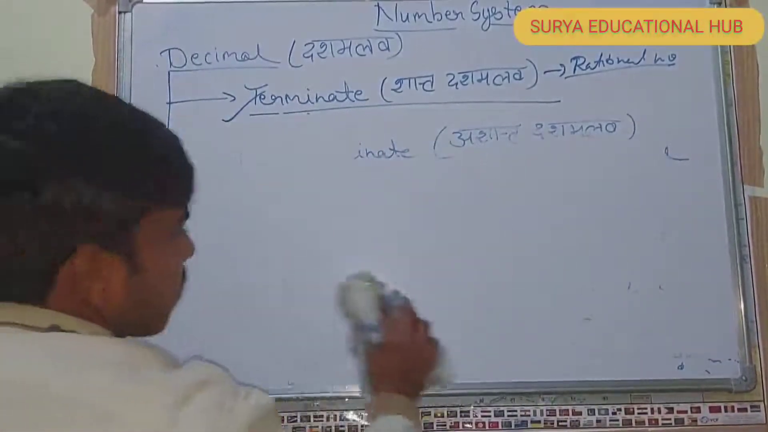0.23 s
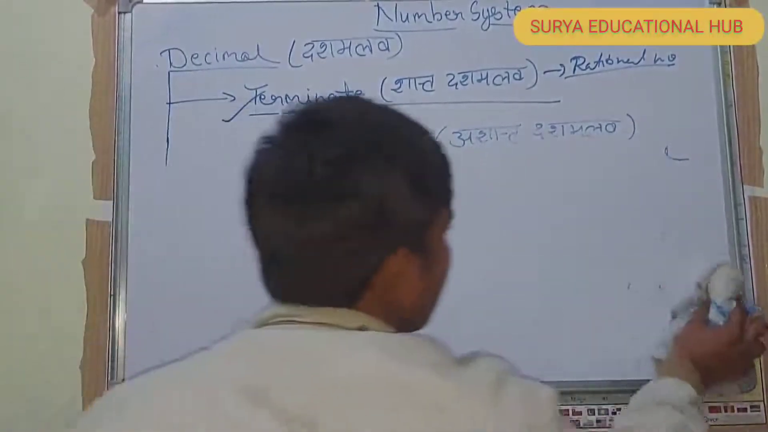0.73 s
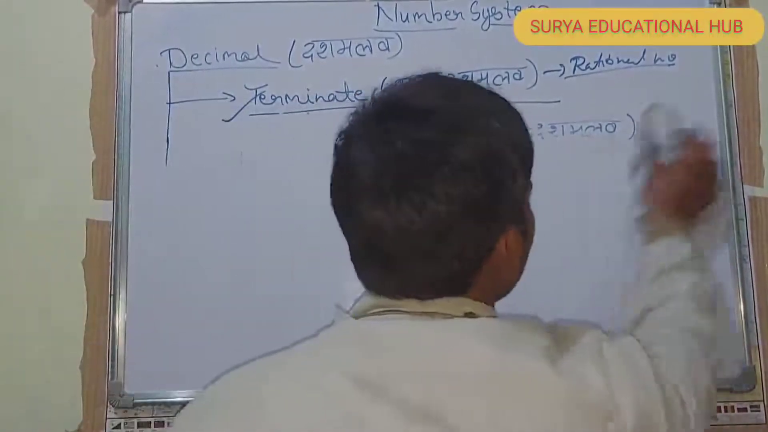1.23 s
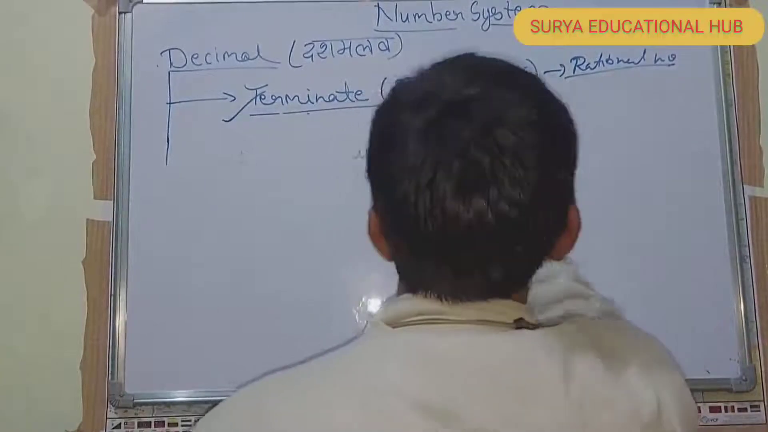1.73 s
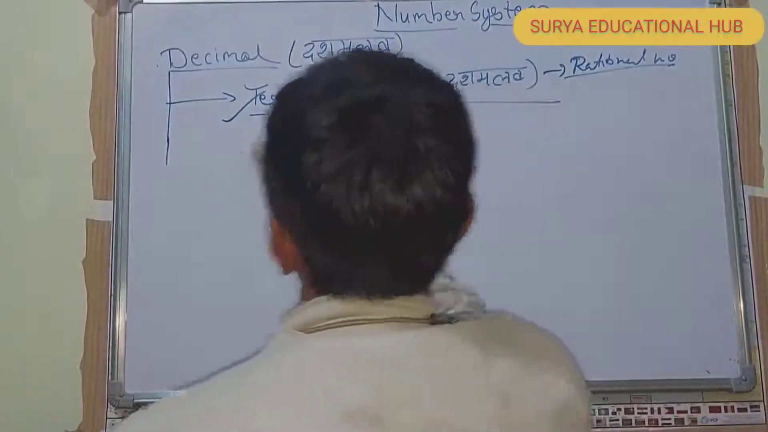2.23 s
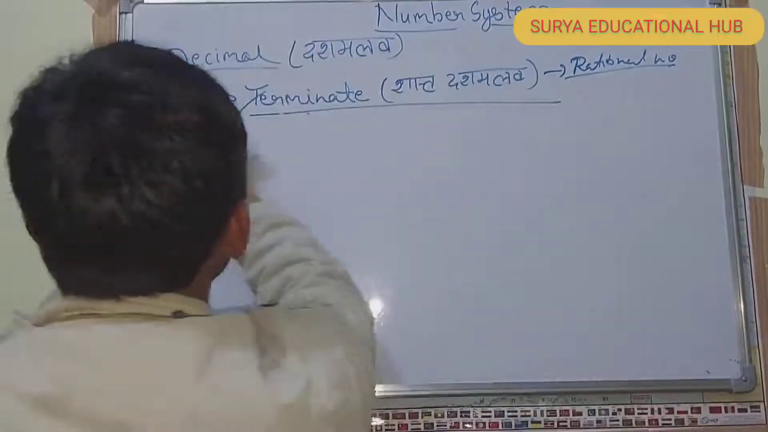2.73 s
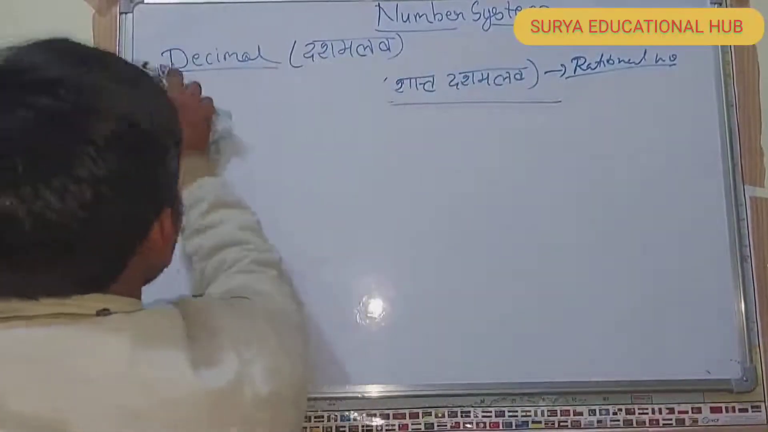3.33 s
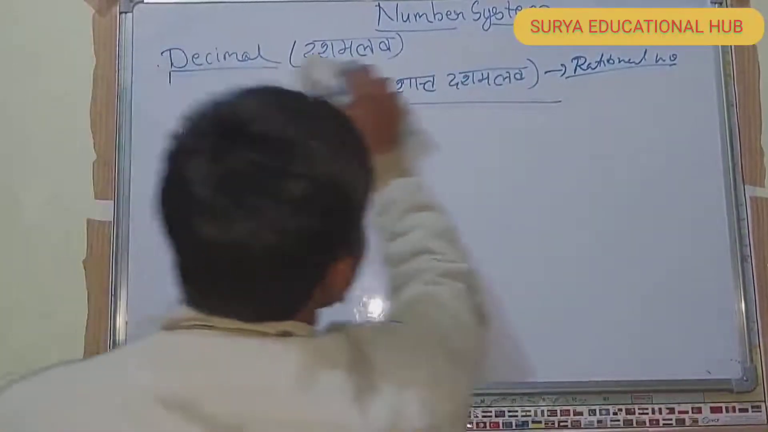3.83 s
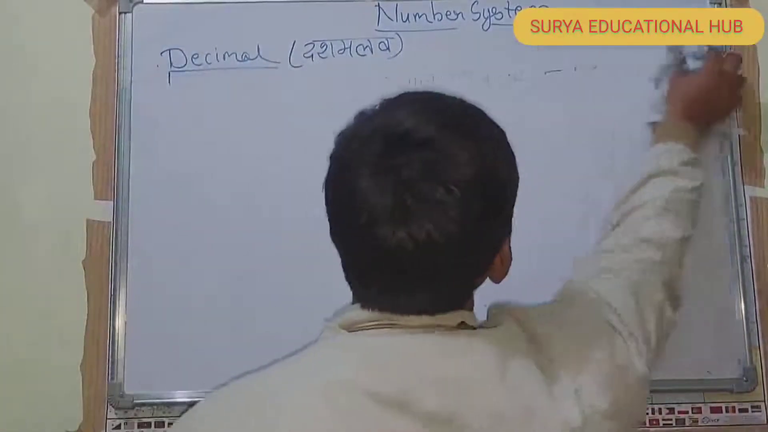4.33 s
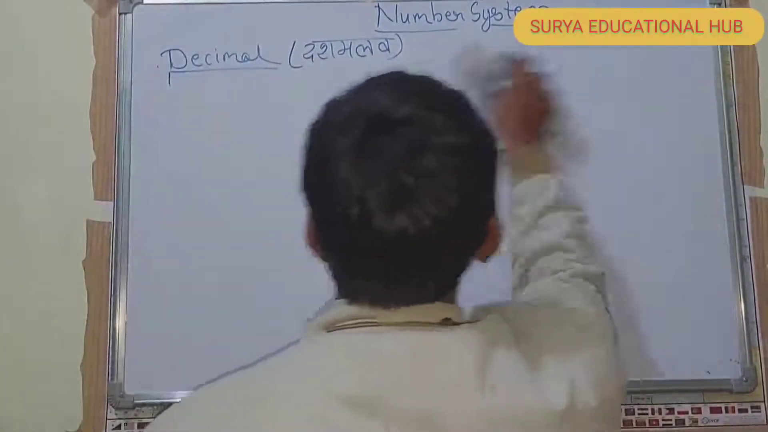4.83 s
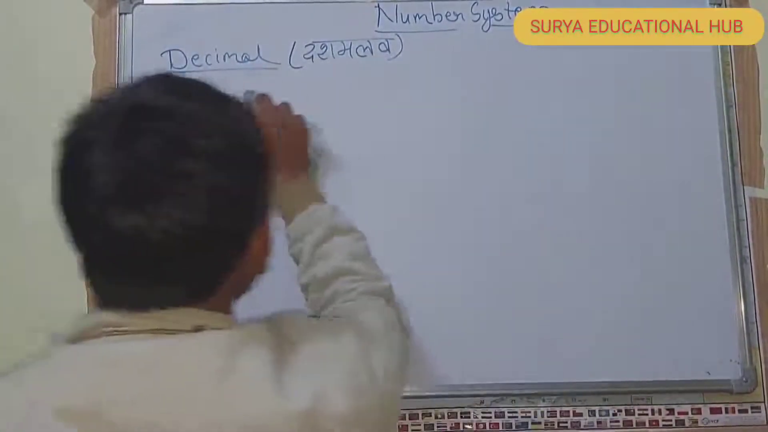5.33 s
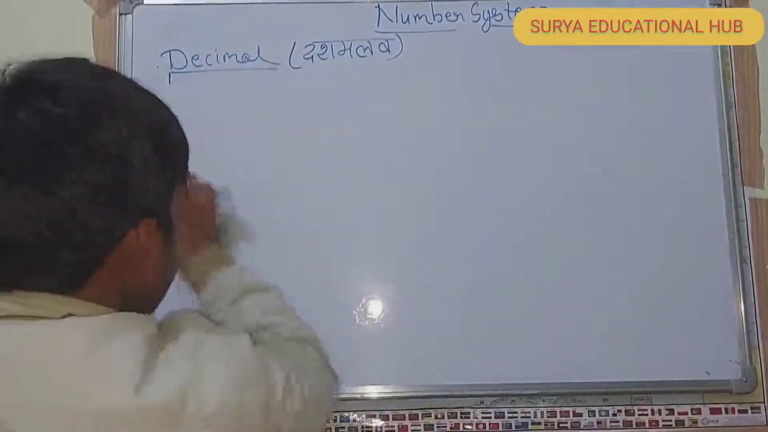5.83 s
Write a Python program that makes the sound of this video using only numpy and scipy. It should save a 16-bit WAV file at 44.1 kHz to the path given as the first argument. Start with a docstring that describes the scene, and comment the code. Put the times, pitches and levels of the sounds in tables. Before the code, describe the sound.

Shirt fabric drags over a clip-on microphone as an arm reaches across a whiteboard. Short dry scrapes arrive with muffled low thumps and sharp little ticks, unevenly spaced, with very quiet gaps holding only soft cloth hiss. The heaviest rubs come just before three seconds and near three and a half; later ones are lighter, with one tiny hollow knock. The stereo is narrow, bass leaning slightly right, with hardly any room sound.

```python
"""At a whiteboard, wiped with a cloth; a small microphone with two capsules is worn on the wiper's shirt.
Each reach of the arm drags fabric over it: a dry scrape of grainy noise and a lumpy rumble through the
housing, both set by a list of rubs; damped swings make the thumps, short noise bursts the ticks.
The cloth on the board adds a fine hiss. Almost no room is heard, only a faint floor and capsule noise."""
import sys
import numpy as np
from scipy import signal
from scipy.fft import rfft, irfft, next_fast_len
from scipy.io import wavfile
from scipy.ndimage import uniform_filter1d, map_coordinates

SR = 44100
rng = np.random.default_rng(int(sys.argv[2]) if len(sys.argv) > 2 else 0)


def to_wav(s):
    """Save 16-bit WAV."""
    ch = np.atleast_2d(s).T  # columns
    pcm = np.round(np.clip(ch, -1, 1) * 32767)  # PCM
    wavfile.write(sys.argv[1], SR, pcm.astype(np.int16))


N = 267687  # length in samples


def amp(db):
    """Decibels to gain."""
    return 10 ** (np.asarray(db) / 20)


def unit(x):
    """Scaled to rms 1."""
    return x / np.sqrt(np.mean(x ** 2) + 1e-20)


def along(points, hz):
    """Curve through (f/Hz, value) points on a log frequency axis."""
    f, value = np.transpose(points)
    return np.interp(np.log(hz + 1), np.log(f + 1), value)


def curves(rows):
    """One value per sample for each column after the time."""
    s, *columns = np.transpose(rows)
    return [np.interp(np.arange(N) / SR, s, column) for column in columns]


def wobble(rate):
    """A smooth random curve, rate knots a second."""
    knots = rng.standard_normal(int(N * rate / SR) + 4)
    return map_coordinates(knots, [np.arange(N) * rate / SR])


def coloured(x, spectrum):
    """x through a causal (minimum-phase) filter with this spectrum, closed at both ends."""
    m = next_fast_len(N + 8192)
    closed = [(1, -90), *spectrum, (SR / 2, -90)]
    gain = amp(along(closed, np.fft.rfftfreq(m, 1 / SR)))
    # folding the cepstrum onto positive time makes the filter causal
    cepstrum = irfft(np.log(gain), m)
    cepstrum[1:m // 2] *= 2
    cepstrum[m // 2 + 1:] = 0
    return irfft(rfft(x, m) * np.exp(rfft(cepstrum)), m)[..., :N]


def fibres(rate, spread_db, share):
    """Noise plus sparse slips of uneven size, as threads catch and let go."""
    slipping = rng.random(N) < rate / SR
    slips = slipping * rng.standard_normal(N) * amp(spread_db * rng.exponential(size=N))
    return np.sqrt(share) * unit(slips) + np.sqrt(1 - share) * rng.standard_normal(N)


def patchy(x, depth_db, size):
    """Random patches of gain in time and frequency, as folds of fabric shift."""
    z = signal.stft(x, nperseg=512)[2]
    across_pitch = uniform_filter1d(rng.standard_normal(z.shape), size, 0)
    field = uniform_filter1d(across_pitch, 4, 1)
    return unit(signal.istft(z * amp(depth_db * unit(field)), nperseg=512)[1][:N])


# Quiet room and capsule: f/Hz, relative level/dB per Hz
ROOM_SPECTRUM = [(24, -48), (40, 12), (480, -17), (680, -16.5), (1850, -10), (3200, -30), (3700, -23),
                 (4600, -24), (5400, -12), (8770, -9), (13000, -6.5), (16000, -21)]
ROOM_DB = -68  # rms


def room():
    """The quiet room at the shirt: a faint steady noise floor."""
    return amp(ROOM_DB) * unit(coloured(rng.standard_normal(N), ROOM_SPECTRUM))


# Each capsule's own hiss: f/Hz, relative level/dB per Hz
CAPSULE_SPECTRUM = [(3000, -32), (5000, -8.5), (7000, -3.5), (9000, -13.5), (14000, -18)]
CAPSULE_DB = -88  # rms


def capsule_noise():
    """Each capsule hisses independently of the other."""
    return amp(CAPSULE_DB) * unit(coloured(rng.standard_normal((2, N)), CAPSULE_SPECTRUM))


# Fabric dragging over the capsule: t/s at full strength, rise/s, hold/s, fall/s,
# scrape level/dB, hiss level/dB over scrape, housing level/dB, deep level/dB over housing
RUBS = [(0.0, .05, 0.0093, .1, -47, -11, -45, -2), (1.038, 0.13, .005, 0.21, -58.5, -1, -65, -5),
        (1.388, .04, 0.038, .06, -66.5, 8, -57.5, -7), (1.523, 0.062, 0.059, 0.39, -57, 1.5, -57.5, -3),
        (1.59, 0.04, 0.076, .1, -48.5, -5, -51, -4), (1.676, 0.081, .045, 0.047, -45, -8, -41, -9),
        (1.82, 0.0062, 0.0016, .02, -51, -8, -40, -3.5), (1.923, 0.21, .005, 0.063, -60.5, -5, -56.5, -11),
        (1.993, 0.0058, 0.013, 0.24, -61.5, -3, -51.5, -6.5),
        (2.156, 0.096, 0.093, 0.08, -53, -5, -57.5, -20), (2.261, 0.09, 0.044, .03, -57.5, -6, -46, -3.5),
        (2.315, 0.035, 0.041, 0.028, -44, -7, -41, -1.5), (2.427, .006, .03, 0.12, -77, -5, -54.5, 5.5),
        (2.493, 0.065, .005, 0.054, -71.5, 8.5, -55, -2),
        (2.663, 0.033, 0.026, 0.039, -44, -5.5, -41.5, -4), (2.73, 0.044, 0.017, .03, -65, -6, -52.5, 5),
        (2.764, 0.0089, 0.043, 0.033, -40.5, 1, -32.5, -9),
        (2.791, 0.051, 0.052, 0.026, -33.5, -2, -31.5, -9.5), (2.991, 0.2, .005, 0.25, -68, 4.5, -57.5, -5),
        (3.184, .005, 0.12, 0.055, -63, 0.5, -52.5, -3.5),
        (3.336, 0.055, .003, 0.034, -39.5, -5.5, -43.5, 10),
        (3.357, 0.056, 0.062, 0.036, -58, 3.5, -43, 2.5), (3.429, 0.081, .053, 0.012, -33.5, -3, -28, -10),
        (3.5, 0.053, 0.052, 0.097, -62, -2, -62.5, 5), (3.749, 0.016, 0.045, 0.012, -45, -2, -43.5, -6),
        (3.805, 0.011, .003, 0.16, -63, -2, -46, -5), (4.237, 0.11, 0.13, .06, -69, 4, -62, -13),
        (4.644, 0.084, 0.062, 0.14, -52, -3, -49, -4.5), (4.74, .1, 0.037, 0.024, -57.5, -2, -57.5, -12),
        (4.926, 0.17, .005, 0.18, -65, 1.5, -55, -1), (5.123, .008, 0.094, 0.25, -79, 9, -54.5, -4),
        (5.341, .2, 0.019, 0.061, -78, -5, -56, -1.5), (5.261, 0.2, .005, 0.18, -54.5, -3, -69, -9),
        (5.497, 0.043, 0.0099, 0.073, -44.5, -9, -43.5, 2.5),
        (5.695, 0.056, 0.0057, 0.06, -48, -9, -44.5, 0), (5.872, 0.067, 0.078, 0.15, -56, -1.5, -44.5, 2.5),
        (5.979, 0.068, 0.0046, 0.19, -47.5, -1.5, -47.5, -10)]
RAMP_DB = 25  # climbed in the rise time, lost in the fall time
LINGER_DB, LINGER_DB_PER_S = -25, 134  # the housing shakes on after a rub lets go
# Light contact between the rubs: t/s, scrape level/dB, hiss level/dB, housing level/dB,
# deep level/dB (all four before fidgeting), left minus right level/dB in light contact before CABLE
LIGHT_CONTACT = [(0, -86, -64, -75, -68, -10.5), (.2, -74.5, -62, -71, -72, -4),
                 (.37, -75.5, -64, -77, -75, -1.5), (.55, -79, -64, -72, -72, -3.5),
                 (.78, -73.5, -65, -71, -61, -8), (.92, -81.5, -66, -76, -75.5, -2),
                 (1.15, -71.5, -67.5, -67.5, -60.5, -9.5), (1.34, -69, -64.5, -64.5, -68, -8),
                 (1.46, -77, -70, -68.5, -63.5, -10), (1.79, -70, -68, -59, -57, -3.5),
                 (1.87, -69, -66, -58, -60.5, -11), (1.985, -89, -72, -69, -68, -13),
                 (2.09, -71, -62, -73, -62.5, -9.5), (2.41, -71, -71, -65, -64, -4.5),
                 (2.55, -76, -75, -66, -73, -9), (2.64, -63, -58.5, -57, -54, -13),
                 (2.89, -66.5, -73, -50, -56.5, -6.5), (3.15, -87, -73, -81, -71.5, -8),
                 (3.68, -83.5, -68.5, -71, -68, -4.5), (3.96, -77.5, -69.5, -69, -68.5, -7),
                 (4.16, -77, -67.5, -66, -61.5, -10.5), (4.47, -82, -71, -71.5, -76.5, -6),
                 (4.83, -92, -69.5, -65, -61, -8), (5.05, -82, -69.5, -69, -79, -9),
                 (5.41, -92, -69.5, -80.5, -66, -9), (5.62, -71, -64.5, -86, -79, -4),
                 (5.8, -69, -61.5, -70, -66, -9.5), (6.07, -62, -60, -72, -72, -1.5)]
FIDGET_DB, FIDGET_RATE = 1.5, 11  # unsteadiness of the light contact, knots a second


def levels():
    """Scrape, hiss, housing and deep levels in dB: every rub rises, holds and falls over light contact."""
    t = np.arange(0, N + 64, 32) / SR  # a coarse clock is enough for the envelopes
    power = np.zeros((4, len(t)))
    for s, rise, hold, fall, scrape_db, hiss_db, body_db, deep_db in RUBS:
        before, after = np.maximum(s - t, 0), np.maximum(t - s - hold, 0)
        # the factor 2 turns amplitude into power
        shape = amp(-2 * RAMP_DB * (before / rise + after / fall))
        linger = (t > s) * amp(2 * (LINGER_DB - LINGER_DB_PER_S * after))
        shake = np.maximum(shape, linger)
        peaks_db = np.array([[scrape_db], [scrape_db + hiss_db], [body_db], [body_db + deep_db]])
        power += amp(2 * peaks_db) * [shape, shape, shake, shake]
    rubs = [np.interp(np.arange(N) / SR, t, p) for p in power]
    cloth = FIDGET_DB * wobble(FIDGET_RATE)
    shirt = FIDGET_DB * wobble(FIDGET_RATE)
    light = np.array(curves(LIGHT_CONTACT)[:4]) + [cloth, 0.59 * cloth, shirt, shirt]
    return 10 * np.log10(rubs + amp(2 * light))


# Dry scrape of the weave: f/Hz, relative level/dB per Hz
SCRAPE = [(300, -19.5), (700, -2), (965, -3.5), (1280, -3), (2050, -5.5), (2450, -1.5), (2910, -2),
          (3300, -7.5), (3800, -16.5), (4400, -19), (5200, -13.5)]
# Resonance of the covered sound port: f/Hz, relative level/dB
PORT = [(1800, -39.5), (2400, -4), (3000, -2.5), (3450, 14.5), (3900, -30.5)]
# Hiss of light brushing: f/Hz, relative level/dB per Hz
HISS = [(3500, -26.5), (4500, -21.5), (5600, -7), (7500, -1), (9200, 0.5), (12500, -2), (14000, -10),
        (15800, -42)]
# Hiss of fabric pressed on the capsule: f/Hz, relative level/dB per Hz
CONTACT = [(3500, -31.5), (4500, -13), (5600, 1.5), (6500, 1), (9200, -5.5), (12500, 1), (14000, -8),
           (15800, -18.5)]


def rubbing(effort, hiss_db):
    """Fabric dragged over the capsule: the weave shakes scrape and hiss together."""
    weave = wobble(41)
    pressed = 1 / (1 + amp(-55.0 - effort))  # firm strokes touch the capsule and recolour the hiss
    covered = 1 / (1 + amp(2 * (-46.5 - effort)))  # the hardest ones close over the sound port
    drag = coloured(fibres(2500, spread_db=2.27, share=0.37), SCRAPE)
    drag = unit(drag) + 0.53 * covered * unit(coloured(drag, PORT))
    scrape = patchy(amp(0.43 * weave + 1.03 * wobble(150)) * drag, depth_db=1.56, size=4)
    brushing = unit(coloured(fibres(2500, spread_db=1.1, share=.08), HISS))
    contact = unit(coloured(fibres(1200, spread_db=2.2, share=.2), CONTACT))
    hiss = np.sqrt(pressed) * contact + np.sqrt(1 - pressed) * brushing
    hiss = patchy(amp(0.8 * weave + 1.1 * wobble(200)) * hiss, depth_db=1.5, size=14)
    return amp(effort) * scrape, amp(hiss_db) * hiss


# Housing resonances: f/Hz, relative level/dB per Hz
HOUSING = [(60, -44.5), (140, -2.5), (190, -2), (248, -2.5), (390, -7.5), (463, -8), (650, -11.5),
           (900, -17), (1500, -35)]
# Deep heave of the housing: f/Hz, relative level/dB per Hz
DEEP = [(24, -52), (40, -12.5), (60, 1), (90, -2), (130, -4.5), (250, -20.5)]


def rumble(body_db, deep_db):
    """Structure-borne sound: grainy noise through the housing resonances over a deep heave."""
    body = amp(0.84 * wobble(40)) * coloured(fibres(500, spread_db=2.5, share=0.31), HOUSING)
    body = patchy(body, depth_db=3.5, size=2)
    deep = unit(amp(1.5 * wobble(42)) * coloured(rng.standard_normal(N), DEEP))
    return amp(body_db) * body + amp(deep_db) * deep


# Tugs on the housing: t/s at the swing's centre, envelope peak level/dB, f/Hz
TUGS = [(0.088, -49, 135), (0.498, -56.5, 240), (0.585, -51, 219), (0.659, -56, 98), (0.755, -53, 110),
        (0.787, -54, 110), (1.056, -55, 208), (1.401, -54, 217), (1.604, -34, 90.5), (1.729, -35, 220),
        (1.746, -40, 110), (1.824, -42, 167), (1.922, -46, 300), (2.006, -47, 178), (2.038, -51, 120),
        (2.061, -48, 90), (2.28, -34.5, 190), (2.319, -38, 324), (2.347, -40, 90), (2.372, -45, 90),
        (2.429, -36.5, 182), (2.452, -46, 95), (2.666, -34, 360), (2.687, -30.5, 216), (2.765, -27, 167),
        (2.812, -36, 290), (3.189, -50, 200), (3.343, -31.5, 122), (3.378, -35, 136), (3.438, -21, 260),
        (3.482, -29, 460), (3.495, -37, 90), (3.792, -38.5, 225), (3.814, -39, 149), (4.096, -48, 64.7),
        (4.649, -37.5, 75.5), (4.781, -43.5, 193), (4.881, -55, 119), (4.947, -50, 163),
        (5.146, -44.5, 119), (5.36, -53, 158), (5.494, -40, 78.6), (5.68, -49, 110), (5.719, -39, 86.5),
        (5.866, -41, 147), (5.879, -43, 134), (5.89, -41, 170), (5.917, -35, 120), (5.941, -40, 150),
        (5.99, -29.5, 152)]


def thumps():
    """A tug pushes the capsule once; it swings back within a cycle or two."""
    out, t = np.zeros(N + 8192), np.arange(-2048, 2048) / SR
    for s, db, hz in TUGS:
        cycles = t * hz
        envelope = np.exp(-np.where(t < 0, 6, 1.5) * cycles ** 2)  # quick push, slower return
        swing = envelope * np.cos(2 * np.pi * cycles + rng.uniform(0, 2 * np.pi))
        out[round(s * SR):][:len(t)] += amp(db) * swing
    return out[2048:][:N]


# Fibres snapping: t/s, click level/dB, body level/dB over click (both nominal, before offset and colouring)
SNAPS = [(0.7846, -40, -17), (1.2824, -59, -10), (1.651, -33.5, -4), (1.8192, -40.5, -4),
         (1.917, -49.5, 8.5), (2.001, -49, -2), (2.0364, -45.5, -7), (2.3136, -50, -7), (2.426, -56, 4),
         (2.6582, -48, -3), (2.7357, -46, 2), (2.76, -40, -3), (3.184, -58, 3), (3.188, -48.5, -15),
         (3.2082, -42, -20), (3.328, -47, -8), (3.3758, -34, -7), (3.397, -27.5, -10), (3.5266, -43, -21),
         (3.5612, -43.5, -23), (3.7432, -33, -8), (3.7894, -47, -18), (4.3316, -43.5, -16),
         (5.1214, -46, -28), (5.484, -44.5, 7), (5.8591, -41, -8), (5.9818, -30, 0), (6.009, -36, -2),
         (6.034, -36.5, 3)]
# A small hollow knock: t/s, starting level/dB, f/Hz, 60 dB decay time/s
KNOCK = (4.334, -53, 760, .07)


def ticks():
    """A snap is a burst of a few milliseconds, a fine click and a longer body; one hollow knock rings."""
    fine, body, t = np.zeros(N + SR), np.zeros(N + SR), np.arange(2048) / SR
    for s, db, body_db in SNAPS:
        burst = np.sign(rng.standard_normal((2, len(t))))
        # the click falls 60 dB in 3 ms, the body in 6 ms
        fine[round(s * SR):][:len(t)] += amp(db + 6.5 - 60 * t / 0.003) * burst[0]
        body[round(s * SR):][:len(t)] += amp(db + body_db + 8.5 - 60 * t / .006) * burst[1]
    s, db, hz, t60 = KNOCK
    since = np.maximum(np.arange(N) / SR - s, 0)
    knock = amp(db - 60 * since / t60) * np.sin(2 * np.pi * hz * since)
    return coloured(fine[:N], HISS) + coloured(body[:N], SCRAPE) + knock


# How the lean between the capsules falls with pitch: f/Hz, level/dB
CABLE = [(30, 3.5), (90, 1), (200, -1.5), (600, -2.5), (1300, -9), (2600, -13.5), (4000, -23)]
FIRM_DB, FIRM_SLOPE = -48, 2.7  # housing level above which both capsules move alike, and how abruptly


def cable_pull(solid, body_db):
    """A pull through the cable moves the right capsule more than the left, above all in the bass."""
    firmness = amp(FIRM_SLOPE * (uniform_filter1d(body_db, size=1024) - FIRM_DB))
    pull_db = curves(LIGHT_CONTACT)[4] / (1 + firmness)
    lean = np.tanh(pull_db * np.log(10) / 40)  # half the channel difference over the mean
    return lean * coloured(solid, CABLE) * [[1], [-1]]


def scene():
    """Rubs, thumps and floor lean with the cable; hiss and ticks reach both capsules alike."""
    effort, hiss_db, body_db, deep_db = levels()
    scrape, hiss = rubbing(effort, hiss_db)
    solid = rumble(body_db, deep_db) + thumps() + scrape + room()
    return solid + hiss + ticks() + capsule_noise() + cable_pull(solid, body_db)


TOP_HZ = 15830  # band limit


def record(dry):
    """The recorder keeps nothing above its band limit."""
    m = next_fast_len(N + 8192)
    in_band = np.fft.rfftfreq(m, 1 / SR) < TOP_HZ
    return irfft(rfft(dry, m) * in_band, m)[:, :N]


dry = scene()
out = record(dry)
to_wav(out)
```